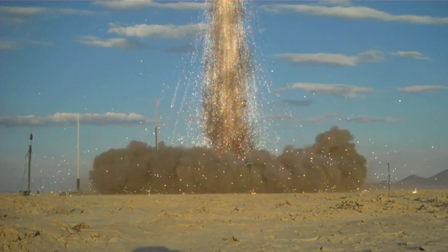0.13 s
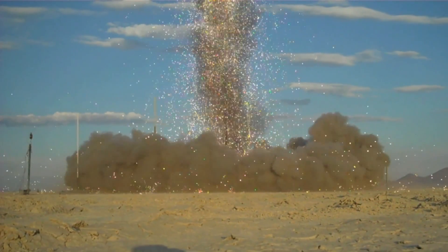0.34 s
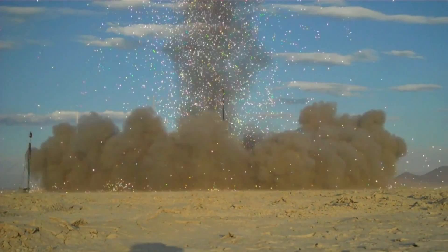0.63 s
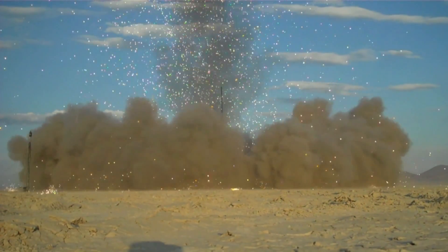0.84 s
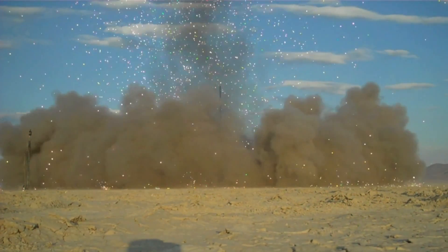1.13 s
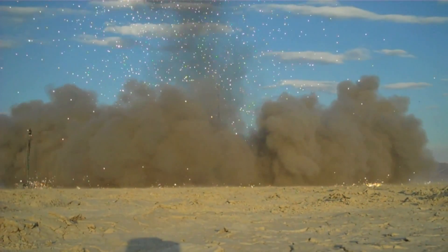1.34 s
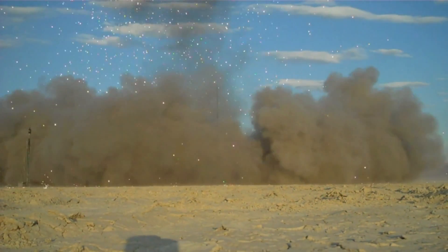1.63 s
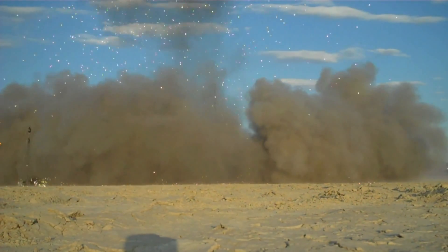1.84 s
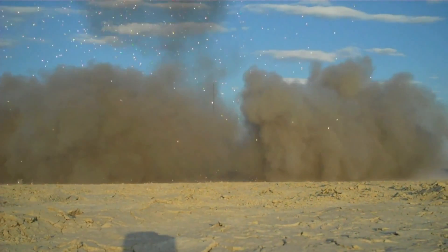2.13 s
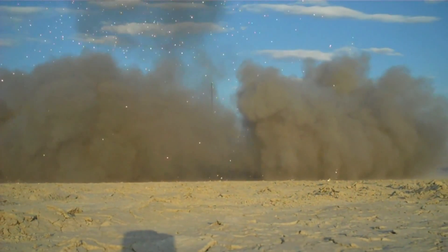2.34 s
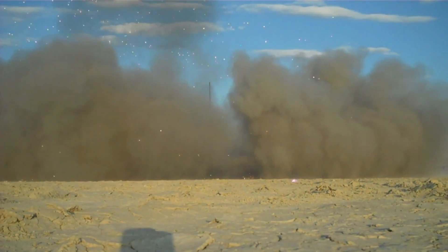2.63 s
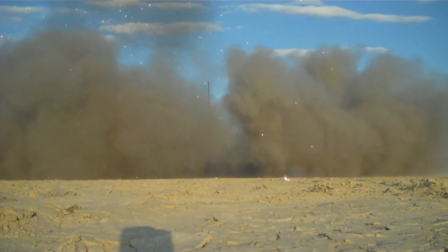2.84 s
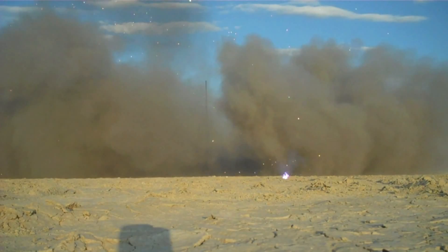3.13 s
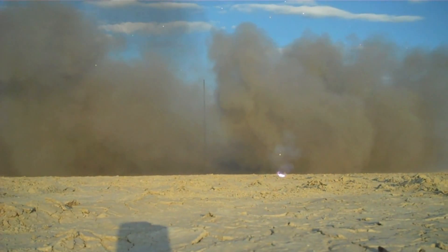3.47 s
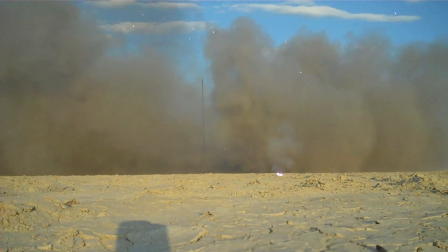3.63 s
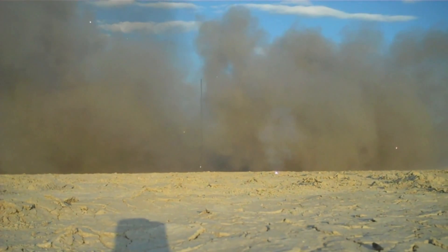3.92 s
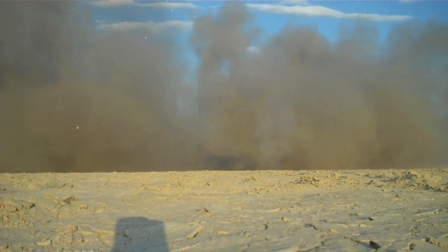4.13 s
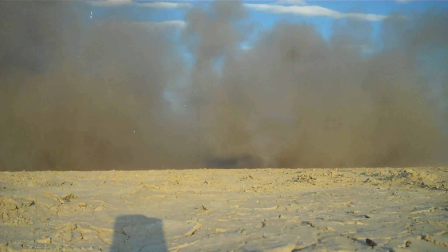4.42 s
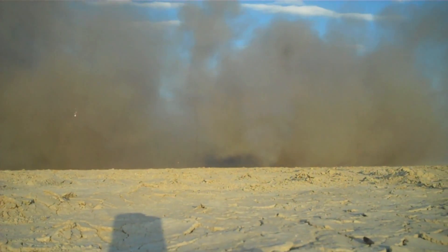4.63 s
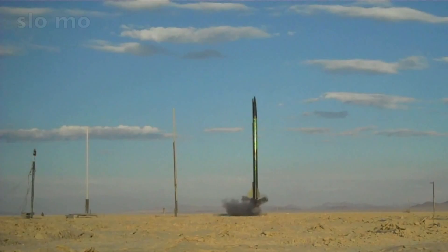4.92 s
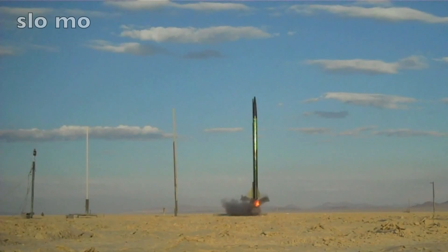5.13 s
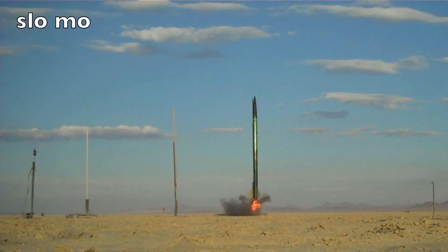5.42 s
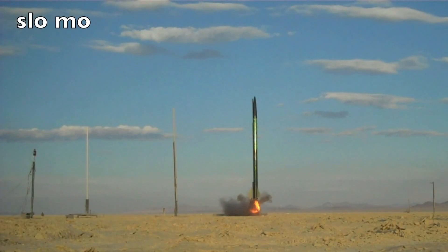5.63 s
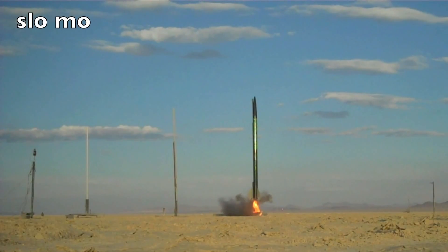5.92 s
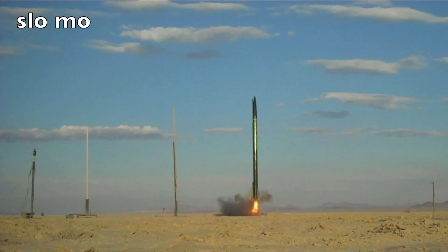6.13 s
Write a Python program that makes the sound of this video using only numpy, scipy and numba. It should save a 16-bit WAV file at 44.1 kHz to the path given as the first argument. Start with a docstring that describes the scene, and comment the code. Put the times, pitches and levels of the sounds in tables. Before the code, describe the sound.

From 0 s a rocket launch is already at full blast: a harsh, tearing roar with dense crackle and bright hiss, flattened into grit by an overloaded camera microphone in open desert. Low buffeting swells around 0.8 s; after about 1 s the distortion eases. As the rocket climbs, treble drains away and ground reflections sweep hollow notches downward through the noise. Sharp pressure thumps, strongest near 1.3, 1.55, 1.9 and 2.5 s, briefly duck the level. From about 2.5 to 4.8 s a fragment sizzles faintly with tiny spits beneath the duller, wavering roar, which weakens after 4 s and fades out by 4.9 s. A far quieter slow-motion replay follows: muffled igniter hiss peaking near 5.2 s, low gas puffs, a deep soft thump at 5.58 s, then a sputtering, growing flame with crackles and brief breathy nozzle whistles until the end at about 6.3 s.

```python
"""A solid rocket lifts off a desert pad: filtered noise and clicks make a rasping jet that dulls to a roar
with path and angle, while a delayed ground bounce sweeps notches through it. At first it overloads the
microphone; pressure surges make the camera's gain control duck; a burning fragment sizzles on the sand.
It fades into a slow-motion replay of the ignition: igniter hiss, a thump of decaying sines, a sputtering
flame of modulated noise."""
import sys
import numpy as np
from scipy import signal
from scipy.fft import rfft, irfft, next_fast_len
from scipy.io import wavfile
from scipy.ndimage import uniform_filter1d, minimum_filter1d, map_coordinates
from numba import njit

SR = 44100
rng = np.random.default_rng(int(sys.argv[2]) if len(sys.argv) > 2 else 0)


def wrap_up_sound(samples):
    """Save the sound to the file named by the first command line argument, as 16-bit audio."""
    columns = np.atleast_2d(samples).T
    # keep every value between -1 and 1, then stretch to whole-number steps
    tamed = np.clip(columns, -1, 1)
    steps = np.round(tamed * 32767).astype(np.int16)
    wavfile.write(sys.argv[1], SR, steps)


N = 277428
TIME = np.arange(N) / SR
PAD_M = 60.5  # horizontal distance to the pad
THUMP_S = 5.578  # the motor lights in the replay
# hiss and crackle of the slowed ignition: (frequency [Hz], gain [dB])
SLOW_HISS_COLOUR = [(200, -33), (700, -4), (1200, -0.5), (1600, 0.5), (2000, 0.5), (2400, -6),
                    (2800, -12.5), (3500, -14), (3650, -56.5)]


def undb(db):
    """Decibels to gain."""
    return 10 ** (np.asarray(db) / 20)


def unit(x):
    """Scale to rms 1."""
    return x / np.sqrt(np.mean(x ** 2))


def colour(x, points):
    """Filter by (Hz, dB) points joined on a log-frequency axis."""
    hz, db = np.transpose(points)
    size = next_fast_len(N + 8192)
    f = np.maximum(np.fft.rfftfreq(size, 1 / SR), 1)
    gain = undb(np.interp(np.log(f), np.log(hz), db))
    return irfft(rfft(x, size) * gain, size)[..., :N]


def walk(rate_hz):
    """Random levels, each held 1 / rate_hz, joined by ramps; rms 1."""
    k = int(SR / rate_hz)
    held = np.repeat(rng.standard_normal(N // k + 1), k)
    return unit(uniform_filter1d(held, k)[:N])


def noise(points, side_db):
    """Coloured stereo noise: mid near rms 1, plus opposed side noise at side_db."""
    mid, side = unit(colour(rng.standard_normal((2, N)), points))
    return mid + undb(side_db) * side * np.array([[1], [-1]])


def clicks(rate_hz, spread_db, channels):
    """Random clicks, mostly small and a few large; rms 1."""
    sizes = undb(spread_db * np.minimum(rng.exponential(size=(channels, N)), 5))
    train = sizes * (rng.random((channels, N)) < rate_hz / SR)
    return unit(train - train.mean())


def bursts(table, decay_s):
    """Sudden rises that die away, one for each (s, onset dB) row."""
    return sum(undb(db) * (TIME >= s) * np.exp(-np.abs(TIME - s) / decay_s) for s, db in table)


def step(x, centre, width):
    """A smooth change from 0 to 1."""
    return .5 + .5 * np.tanh((x - centre) / (2 * width))


def ramp(start_s, length_s):
    """A straight rise from 0 to 1."""
    return np.clip((TIME - start_s) / length_s, 0, 1)


def rise_and_fall(peak_s, rise_db_per_s, fall_db_per_s):
    """A gain that grows to 1 and dies away."""
    return undb(np.minimum(rise_db_per_s * (TIME - peak_s), fall_db_per_s * (peak_s - TIME)))


def bell(s, half_s):
    """A smooth bump of height 1."""
    return np.exp(-((TIME - s) / half_s) ** 2)


def ports(x, speed=1):
    """Each microphone port has its own treble resonance, which drops with the playback speed."""
    # port response: (frequency [Hz], left [dB], right [dB])
    port_response = [(100, -.4, .4), (2500, -.5, .7), (4500, -2, 0), (5500, -1.5, 2.5), (6300, 1.5, 8),
                     (7000, 3, 3), (7800, 7, -1), (8600, 2, -3.5), (9500, -6, -7.5), (12000, -9, -9.5),
                     (14000, -12, -12)]
    hz, *sides = np.transpose(port_response)
    return np.array([colour(c, np.c_[hz * speed, db]) for c, db in zip(x, sides)])


def buffeting():
    """Slow pressure swings push unevenly on the two ports, build to a peak and die away."""
    # (frequency [Hz], gain [dB])
    buffet_colour = [(12, -24.5), (28, -7.5), (50, 0.5), (75, -8.5), (150, -49)]
    envelope = rise_and_fall(peak_s=.82, rise_db_per_s=9.5, fall_db_per_s=16.5)
    return noise(buffet_colour, side_db=-4.5) * undb(-34) * envelope


def fragment():
    """A scrap of burning propellant sizzles on the ground and spits now and then."""
    # the burn catches, falters, flares and dies down: (time [s], level before gain_db [dB])
    sizzle = [(2.55, -63), (2.72, -62.5), (2.85, -56.5), (3.06, -57.5), (3.2, -54.5), (3.23, -58.5),
              (3.35, -58), (3.61, -52), (4.53, -57), (4.8, -58.5)]
    # spits: (time [s], onset level [dB])
    spits = [(3.496, -39), (3.682, -47), (3.888, -39), (4.387, -44.5)]
    gain_db, pan_db = 4, 2.0
    fizz = noise([(1000, -11.0), (3000, 6.5), (4000, 0.5), (5500, 5.0), (8000, 2), (10000, 1.5),
                  (14000, -6.0)], side_db=-1.5)
    level_db = np.interp(TIME, *np.transpose(sizzle)) + gain_db + .7 * walk(60)
    burn = step(TIME, 2, .15) * undb(level_db)
    return fizz * (burn + bursts(spits, decay_s=.0015)) * undb([[pan_db], [-pan_db]])


def replay_floor():
    """Steady background noise of the replay."""
    # (frequency [Hz], gain [dB])
    floor_colour = [(100, 4), (600, -1.5), (1500, -8.5), (2400, -5), (3000, -5), (3500, -3.5), (3650, -60)]
    return noise(floor_colour, side_db=-3.5) * undb(-58.0)


def igniter_hiss(igniter, sputter):
    """Slowed igniter gas hisses until the motor lights; spits continue into the flame."""
    # spits: (time [s], onset level [dB])
    slow_spits = [(5.023, -43), (5.966, -49), (6.043, -52), (6.157, -49.5), (6.172, -59)]
    flare = igniter * rise_and_fall(peak_s=5.2, rise_db_per_s=15, fall_db_per_s=11)
    level = undb(-45.5) * flare * sputter + bursts(slow_spits, decay_s=0.0068)
    return noise(SLOW_HISS_COLOUR, side_db=-11) * level


def flame_hiss(sputter):
    """Treble turbulence of the slowed flame, growing once the motor lights."""
    # (frequency [Hz], gain [dB])
    flame_hiss_colour = [(300, -9), (700, -4), (1250, -4), (1600, -3), (1950, 5), (2250, -4), (2800, -5),
                         (3500, -13), (3650, -55)]
    return noise(flame_hiss_colour, side_db=-5) * undb(-63.5) * ramp(THUMP_S, .21) * sputter


def flame_body(igniter, motor, sputter):
    """Low turbulence of the igniter flame, then of the motor flame."""
    # (frequency [Hz], gain [dB])
    flame_colour = [(100, -6), (280, -2), (450, 0), (600, 1.5), (900, -10), (1400, -22), (3000, -50)]
    level = undb(-56.5) * igniter + undb(-56.5) * motor
    return noise(flame_colour, side_db=-25) * level * sputter


def gas_puffs():
    """Low noise of gas from the nozzle: a steady flow plus puffs."""
    # (frequency [Hz], gain [dB])
    gas_colour = [(15, -13), (35, 3.5), (60, 4.5), (110, -3), (170, -10.5), (260, -18.5), (600, -61)]
    # (time [s], half length [s], level added to the flow [dB])
    puffs = [(4.96, 0.033, -40), (5.14, 0.076, -46), (5.285, 0.044, -41), (5.375, 0.032, -43),
             (5.614, .025, -41), (5.666, 0.043, -46), (5.948, 0.046, -45), (6.063, 0.022, -46),
             (6.15, 0.044, -40), (6.234, 0.037, -40)]
    flow = undb(-55.5)
    return noise(gas_colour, side_db=-31) * (flow + sum(undb(db) * bell(s, half_s) for s, half_s, db in puffs))


def flame_crackle(motor):
    """Sparse coloured clicks of the growing flame."""
    snaps = clicks(rate_hz=70, spread_db=6, channels=2)
    return unit(colour(snaps, SLOW_HISS_COLOUR)) * undb(-66) * motor


def nozzle_whistle():
    """The nozzle whistles in short fits of narrow-band noise while the pressure builds."""
    # (frequency [Hz], gain [dB])
    whistle_colour = [(600, -36), (960, -11), (1090, -3), (1210, -19), (1700, -40), (3500, -71)]
    # fits: (time [s], half length [s], level [dB])
    whistles = [(5.885, .06, -57), (6.04, .045, -57), (6.112, 0.0065, -47), (6.145, 0.02, -55),
                (6.25, .04, -61)]
    return noise(whistle_colour, side_db=-12.5) * sum(undb(db) * bell(s, half_s) for s, half_s, db in whistles)


def ignition_thump():
    """The motor lights: decaying sines with soft onsets."""
    # (frequency [Hz], level before onset and decay [dB], t60 [s], rise [s])
    thump_modes = [(36.3, -23, 0.97, 0.056), (58, -45, .3, .01), (119.4, -36, 0.45, 0.0023),
                   (275, -46, 0.12, 0.0022)]
    age_s = np.maximum(TIME - THUMP_S, 0)
    out = np.zeros(N)
    for hz, db, t60_s, rise_s in thump_modes:
        envelope = np.exp(-np.log(1000) * age_s / t60_s) * (1 - np.exp(-age_s / rise_s))
        out += undb(db) * np.sin(2 * np.pi * hz * age_s) * envelope
    return out


def ignition():
    """Slowed down: igniter hiss gives way to a thump, then a sputtering, whistling flame."""
    igniter = 1 - ramp(THUMP_S, .027)
    motor = ramp(THUMP_S, .44)
    sputter = undb(np.where(TIME > THUMP_S, 1.8, .4) * walk(45))
    flame = flame_hiss(sputter) + flame_body(igniter, motor, sputter) + flame_crackle(motor)
    gas = gas_puffs() + nozzle_whistle()
    return ports(igniter_hiss(igniter, sputter) + flame + gas + replay_floor() + ignition_thump(), speed=.25)


def surges():
    """Single pressure peaks with a trough on either side, each joined by a noisy crack."""
    # (time [s], peak [dB], centre to zero crossing [ms], crack onset level [dB])
    surge_table = [(.797, -7.5, 1.92, -50), (0.82, -8, 0.68, -50), (0.916, -12, 1.4, -50),
                   (1.041, -8.5, 1.7, -38), (1.109, -8.5, 1.6, -42), (1.143, -11, 2.6, -55),
                   (1.228, -8, 0.67, -50), (1.269, -11, 2.5, -55), (1.316, 5.5, 1.5, -44),
                   (1.391, -7, 2.2, -60), (1.553, 4.5, 0.94, -40), (1.906, 2, 0.72, -45),
                   (1.989, -2, 1.4, -65), (2.055, -3.5, 1.7, -66), (2.107, -11, .9, -60),
                   (2.466, -8, 0.65, -40), (2.486, 1.5, 0.92, -33), (3.221, 1, 0.66, -60),
                   (3.506, -3, 0.58, -48), (3.738, -5.5, 0.56, -55)]
    out = np.zeros(N)
    for s, db, width_ms, _ in surge_table:
        u = np.minimum((1000 * (TIME - s) / width_ms) ** 2, 100)
        out += undb(db) * (1 - u) * np.exp(-u / 2)
    cracks = [(s, crack_db) for s, _, _, crack_db in surge_table]
    return out + rng.standard_normal(N) * bursts(cracks, decay_s=.001)


def air(x, path_m, knee_hz, steepness=0.958):
    """Air takes away more treble the longer the path."""
    loss_db_per_m = .034  # at 1 on the softened kHz scale
    f, s, frames = signal.stft(x, SR, nperseg=512)
    khz = np.logaddexp(0, (f - knee_hz) / 250) / 4  # kHz above a soft knee
    loss_db = loss_db_per_m * np.outer(khz ** steepness, np.interp(s, TIME, path_m))
    return signal.istft(frames * undb(-loss_db), SR)[1][..., :N]


def ground_echo(x, lag_s):
    """A sound joined by its slightly later, duller bounce off the sand."""
    # sand reflection: (frequency [Hz], gain [dB])
    sand_reflection = [(1000, -.9), (3400, -1.6), (6000, -1.4), (8500, -2.5), (11000, -8), (14000, -14)]
    phase_lag_rad = .2  # porous sand delays every wave by a small part of its cycle
    analytic = signal.hilbert(colour(x, sand_reflection), next_fast_len(N))[:N]
    bounced = np.real(analytic * np.exp(-1j * phase_lag_rad))
    return (x + map_coordinates(bounced, [(TIME - lag_s) * SR], order=3)) / np.sqrt(2)


def beam(elevation_deg, pattern):
    """Gain as the view of the jet turns from its side to its rear."""
    side_db, behind_db, turn_deg, width_deg = pattern
    return undb(side_db + (behind_db - side_db) * step(elevation_deg, turn_deg, width_deg))


def jet_roar(elevation_deg, change_db, spent):
    """Large eddies: noise and clicks in the lower mids, stronger towards the rear."""
    # (frequency [Hz], gain [dB])
    roar_colour = [(50, -43), (90, -13), (150, -0.5), (220, 0), (310, 0), (450, -2), (620, -5), (880, -4),
                   (1200, -8.5), (1500, -17), (3000, -69), (6000, -92)]
    # (side [dB], behind [dB], turn elevation [deg], turn width [deg])
    roar_beam = (-20.5, -17, 20, 3.5)
    eddies = rng.standard_normal((3, N)) + undb(-8.5) * clicks(rate_hz=900, spread_db=1.5, channels=3)
    level_db = change_db - 4 * spent + .5 * walk(22)
    return unit(colour(eddies, roar_colour)) * beam(elevation_deg, roar_beam) * undb(level_db)


def jet_rumble(distance_m, elevation_deg, change_db, spent):
    """Low noise, beamed backwards and weakened by distance."""
    # (frequency [Hz], gain [dB])
    rumble_colour = [(25, -38.5), (50, -15), (75, -1), (100, 1.5), (125, 2), (170, -8), (300, -33.5)]
    # (side [dB], behind [dB], turn elevation [deg], turn width [deg])
    rumble_beam = (-32.5, -17, 46, 4.5)
    db_per_doubling = -3.5
    level_db = change_db + db_per_doubling * np.log2(distance_m / PAD_M) - 12 * spent
    rumble = unit(colour(rng.standard_normal((3, N)), rumble_colour))
    return rumble * beam(elevation_deg, rumble_beam) * undb(level_db)


def jet_blast(elevation_deg, roar_change_db):
    """Sideways blast: coloured clicks that exaggerate the roar's rises and dips."""
    # (frequency [Hz], gain [dB])
    blast_colour = [(150, -29), (420, -2.5), (650, 1.5), (1100, -6.5), (1600, -4), (2200, -7),
                    (4000, -33.5)]
    # (side [dB], behind [dB], turn elevation [deg], turn width [deg])
    blast_beam = (-25, -58.5, 55.5, 2)
    blast = unit(colour(clicks(rate_hz=350, spread_db=3.0, channels=3), blast_colour))
    return blast * beam(elevation_deg, blast_beam) * undb(1.7 * roar_change_db)


def jet_rasp(elevation_deg, change_db, spent):
    """Small shocks: noise and dense uneven clicks, beamed sideways."""
    # (frequency [Hz], gain [dB])
    rasp_colour = [(100, -20), (600, -1.5), (1050, -3), (1300, 1.5), (1600, 0.5), (2100, -1), (2900, 1.5),
                   (3700, -3), (4700, -1), (8000, -7), (14000, -5)]
    # (side [dB], behind [dB], turn elevation [deg], turn width [deg])
    rasp_beam = (-13, -23.5, 60, 5)
    shocks = rng.standard_normal((3, N)) + undb(-7.0) * clicks(rate_hz=2500, spread_db=3.5, channels=3)
    level_db = change_db - 7 * spent + 1.13 * walk(45)
    return unit(colour(shocks, rasp_colour)) * beam(elevation_deg, rasp_beam) * undb(level_db)


def nozzle_hiss(height_m):
    """Treble noise, lost ever faster with height; short waves scatter most in turbulent air."""
    # (frequency [Hz], gain [dB])
    nozzle_colour = [(2000, -23.5), (3500, 1.5), (5000, -3), (6300, 1), (8000, -2.5), (11000, -3),
                     (14000, -4)]
    level_db = -12.5 - 7 * (height_m / 115) ** 1.2
    scattered = undb(1)
    hiss = unit(colour(rng.standard_normal((3, N)), nozzle_colour)) * undb(level_db)
    return hiss * np.array([[1 / scattered], [scattered], [scattered]])


def plume(height_m, distance_m, elevation_deg):
    """Sum of the jet's parts; rows: direct, scattered from ahead, scattered from the sides."""
    # rises and dips of the jet's level, some of the dips from the gain control:
    # (time [s], half length [s], roar [dB], rumble [dB], rasp [dB])
    level_changes = [(0.032, 0.039, 1.5, 3.5, 3), (.17, 0.093, -4.5, -1, 0), (0.279, 0.023, 2, 1.5, 4),
                     (.36, 0.05, 3.5, 7, 2.5), (.45, .03, 0, 10.5, 2), (0.525, 0.029, -3, -5, 3),
                     (0.595, 0.046, 4, 1, 3), (.71, 0.14, 4, 4.5, 3), (0.83, .05, .5, 1, -1.5),
                     (1.056, 0.046, 2, 2.5, 1), (1.144, .04, -2, -4, -4), (1.218, .025, 0, -2.5, 2.5),
                     (1.468, .092, 3, 3, 5.5), (1.802, 0.1, 5.5, 2, 2), (2.073, 0.051, 4, -1.5, -0.5),
                     (2.388, 0.15, 4, 1, 3), (2.923, 0.38, 4, 1.5, 0.5), (3.327, .09, -.5, -0.5, -2.5),
                     (3.588, 0.37, 3, -.5, 1.5)]
    roar_db, rumble_db, rasp_db = sum(np.outer(dbs, bell(s, half_s)) for s, half_s, *dbs in level_changes)
    spent = step(TIME, 4.1, .31)  # the jet's level falls away late in the burn
    low = jet_roar(elevation_deg, roar_db, spent) + jet_rumble(distance_m, elevation_deg, rumble_db, spent)
    high = jet_blast(elevation_deg, roar_db) + jet_rasp(elevation_deg, rasp_db, spent)
    return low + high + nozzle_hiss(height_m)


def rocket():
    """The climb lengthens the path and steepens the angle: the sound dulls, the echo's notches slide down."""
    # climb as heard: (time [s], height [m])
    climb = [(0, 6), (.23, 19.5), (.43, 36.5), (.52, 51), (.6, 62), (.9, 93), (1.3, 135), (2, 214),
             (5, 537)]
    # scatter from ahead and from the sides, before power normalisation:
    # (low view [dB], high view [dB], turn elevation [deg], turn width [deg])
    scatter_beam = (-1, -22.5, 56, 4.5)
    width_beam = (-3, -24.5, 54.5, 6)
    # short waves come more from the sides: (frequency [Hz], gain [dB])
    width_colour = [(300, 0), (600, 1.3), (1100, 3), (2500, 2.2), (5000, 1.8), (9000, 3.5)]
    overhead_lag_ms = .452
    height_m = np.interp(TIME, *np.transpose(climb))
    distance_m = np.hypot(height_m, PAD_M)
    elevation_deg = np.degrees(np.arctan2(height_m, PAD_M))
    jet = plume(height_m, distance_m, elevation_deg)
    straight, from_ahead, from_sides = air(jet, distance_m - PAD_M, knee_hz=1910)
    lag_s = overhead_lag_ms / 1000 * height_m / distance_m
    direct = ground_echo(straight, lag_s)
    wide = colour(ground_echo(from_sides, lag_s), width_colour)
    scatter, width = beam(elevation_deg, scatter_beam), beam(elevation_deg, width_beam)
    mixed = direct + scatter * from_ahead + width * wide * np.array([[1], [-1]])
    return mixed / np.sqrt(1 + scatter ** 2 + width ** 2)


def overload(x):
    """The microphone flattens crests into dense grit; its ceiling rises at a set time."""
    ceiling = undb(-5.3 + 16 * step(TIME, 1.04, .08))
    return x / (1 + (x / ceiling) ** 8) ** (1 / 8)


def scene():
    """The liftoff fades out, then the replay fades in."""
    fade_start_s, fade_end_s = 4.823, 4.922
    liftoff = overload(ports(rocket() + surges() + buffeting() + fragment()))
    fade_out = np.interp(TIME, [fade_start_s, fade_end_s], [1, 0]) ** 0.87
    return liftoff * fade_out + ignition() * ramp(fade_end_s, .071)


@njit
def peak_hold(size, top, release):
    """Follows peaks above top at once and lets go slowly."""
    out, e = np.empty(len(size)), top
    for i in range(len(size)):
        e = max(size[i], e + (top - e) * release)
        out[i] = e
    return out


def record(dry, release_s=0.14):
    """Gain control ducks at large peaks and recovers slowly; crests are rounded; the top is cut."""
    top, knee, room = 1., .55, .35
    gain = top / peak_hold(np.abs(dry).max(axis=0), top, 1 / (release_s * SR))
    held = dry * uniform_filter1d(minimum_filter1d(gain, size=40), size=40)
    clean = np.clip(held, -knee, knee)
    rounded = clean + room * np.tanh((held - clean) / room)
    low_pass = signal.ellip(10, .1, 80, 13950, fs=SR, output="sos")
    return signal.sosfilt(low_pass, rounded)


dry = scene()
out = record(dry)
wrap_up_sound(out)
```